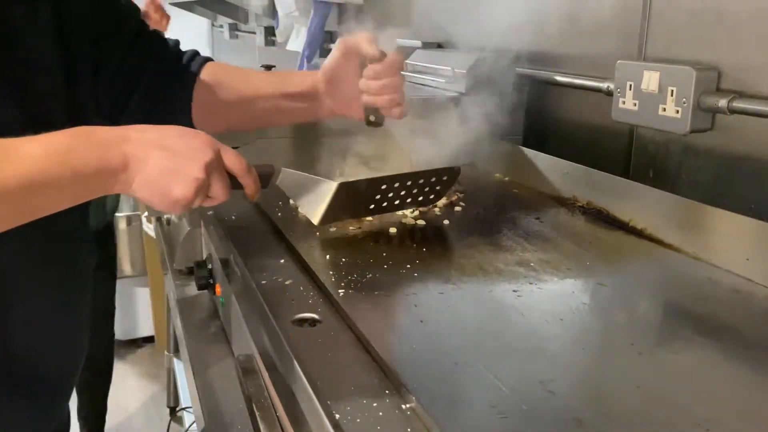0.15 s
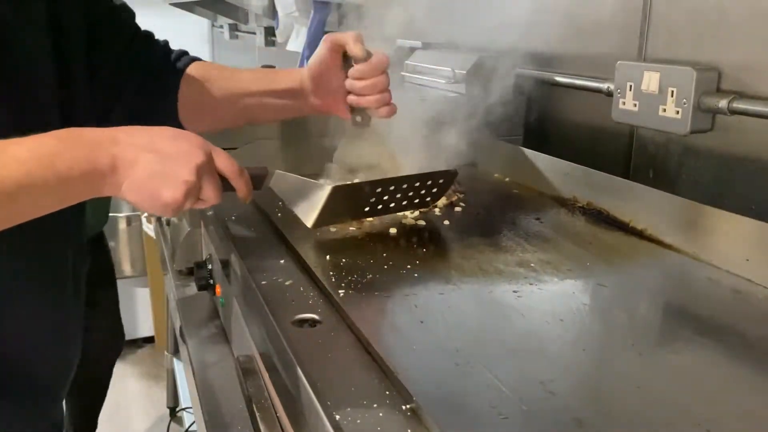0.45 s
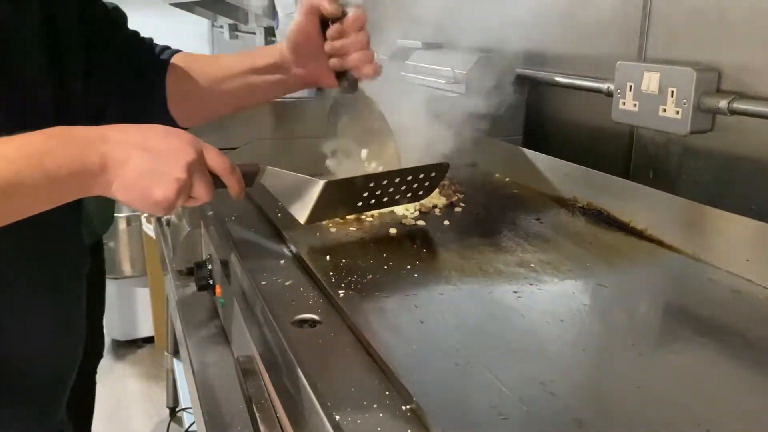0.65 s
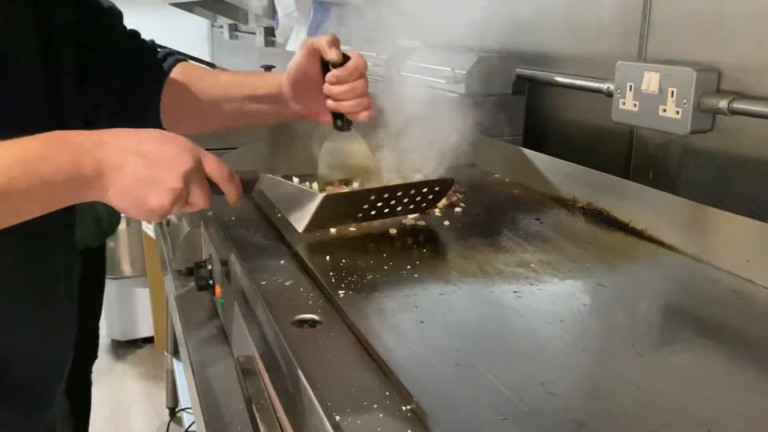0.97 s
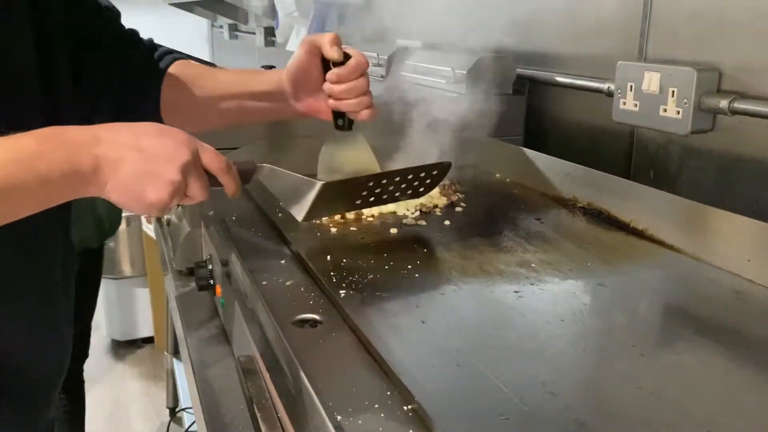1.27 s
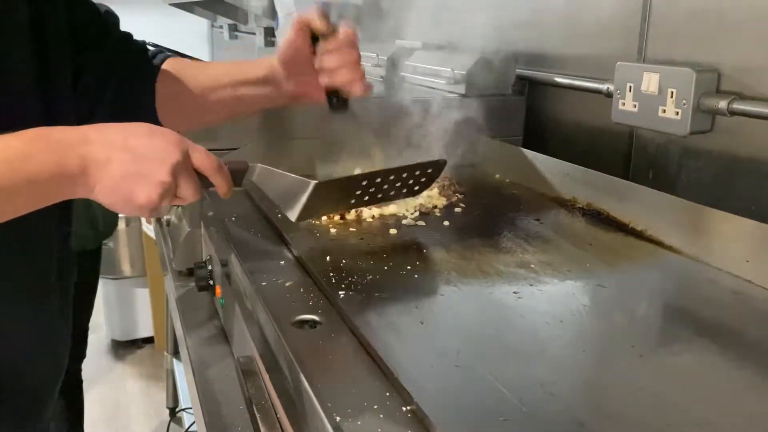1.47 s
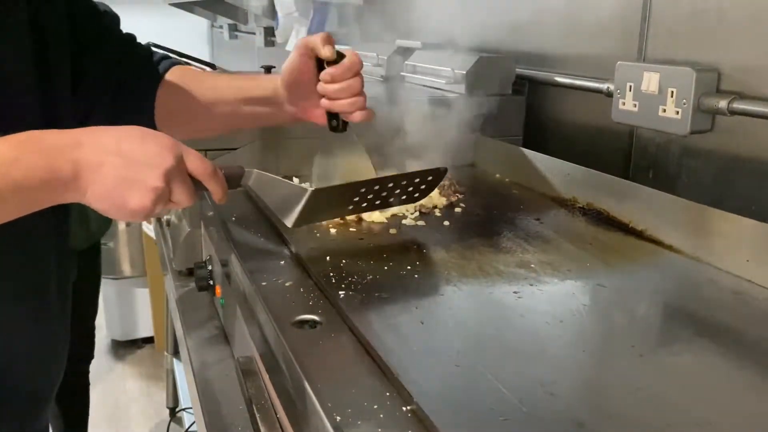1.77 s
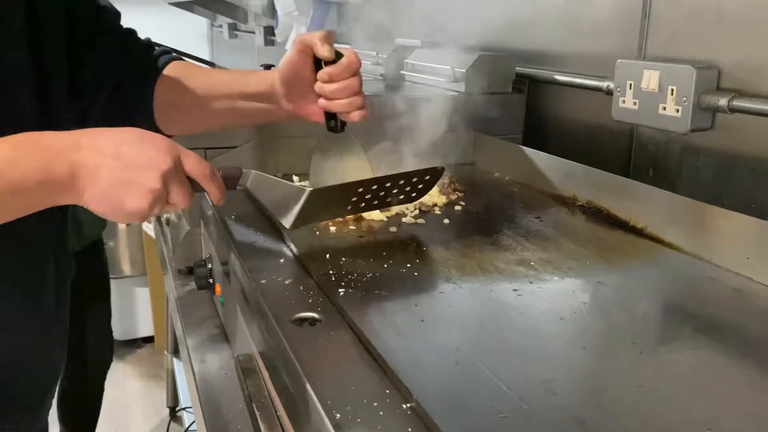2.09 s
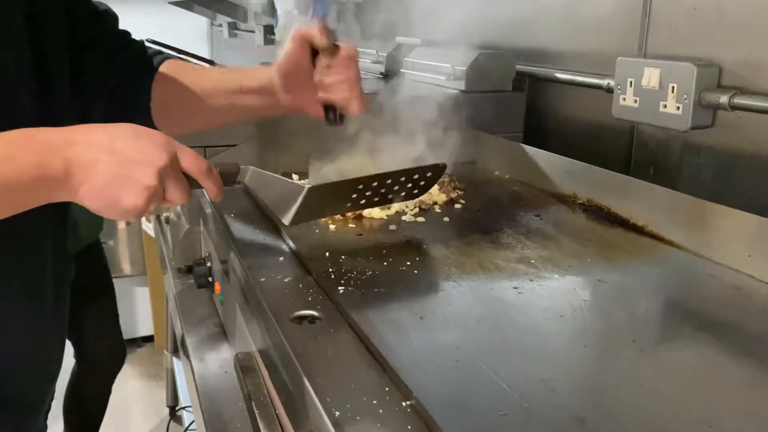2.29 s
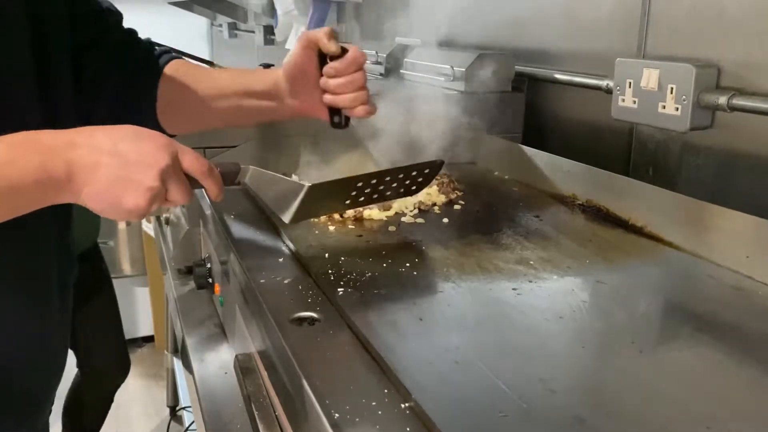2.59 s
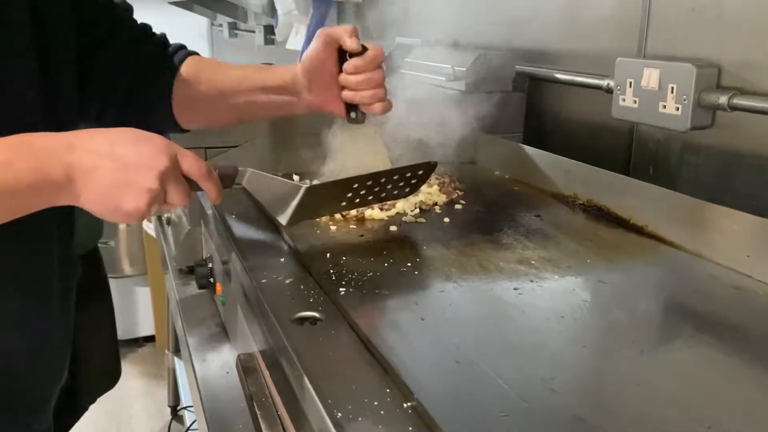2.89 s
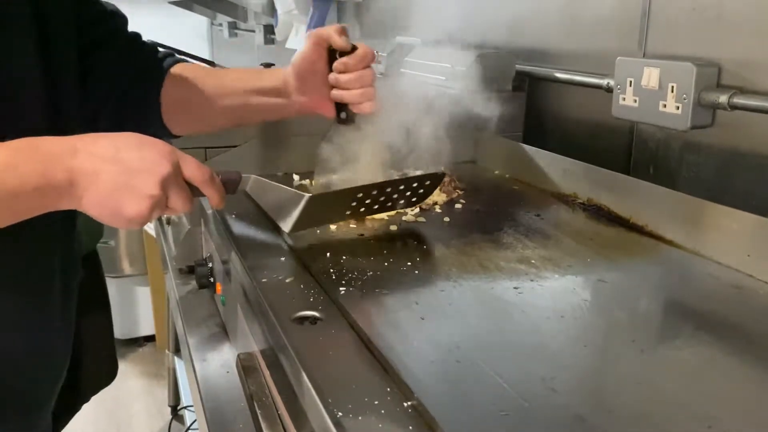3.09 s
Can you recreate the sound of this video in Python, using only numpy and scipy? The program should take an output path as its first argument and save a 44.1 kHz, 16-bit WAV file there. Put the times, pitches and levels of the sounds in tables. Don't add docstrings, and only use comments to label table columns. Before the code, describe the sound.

Steel scraper clacks hard on a hot griddle about four times a second over sizzling fat

```python
import sys
import numpy as np
from scipy import signal
from scipy.fft import rfft, irfft
from scipy.io import wavfile

SR = 44100
rng = np.random.default_rng(int(sys.argv[2]) if len(sys.argv) > 2 else 0)


def amplitude_ratio(level_db):
    exponent = np.asarray(level_db, float) / 20
    return 10 ** exponent


def master_out(mix):
    frames = np.transpose(np.atleast_2d(mix))
    ceiling = np.clip(frames, -1, 1)
    pcm = np.round(ceiling * 32767).astype(np.int16)
    wavfile.write(sys.argv[1], SR, pcm)


N = 143325


def rms_one(x):
    return x / np.sqrt(np.mean(x ** 2) + 1e-20)


def at_hz(rows, hz, column=1):
    table = np.array(rows)
    return np.interp(np.log(hz), np.log(table[:, 0]), table[:, column])


def drift(rate_hz):
    r = np.exp(-80 * np.pi * rate_hz / SR)
    white = rng.standard_normal(N // 40 + 2002)
    slow = signal.lfilter([1], [1, -2 * r, r * r], white)[2000:]
    return np.interp(np.arange(N) / 40, np.arange(len(slow)), rms_one(slow))


def bands(lowest_hz, count):
    edges = lowest_hz * 2 ** (np.arange(count + 1) / 2)
    return [(np.sqrt(a * b), signal.butter(2, [a, b], "band", fs=SR, output="sos"))
            for a, b in zip(edges, edges[1:])]


def coloured(white, spectrum, lowest_hz, patchy_db, count):
    out, together = 0, drift(2.7)
    for k, (hz, sos) in enumerate(bands(lowest_hz, count)):
        flicker_db = patchy_db * (0.34 * together + drift(21.0))
        out = out + amplitude_ratio(at_hz(spectrum, hz) + flicker_db) * signal.sosfilt(sos, white[k % 2])
    return rms_one(out)


# frequency in Hz, level in dB per Hz.
HOOD_SPECTRUM = [(30, -41), (55, -0.5), (100, -5), (280, -7.5), (500, -23), (1000, -23), (1600, -24.5),
                 (4000, -33)]
HOOD_DB, RUMBLE_CUT_HZ = -25, 40
HUM_HZ, HUM_DB = 297, -32.5


def hood():
    phase = 2 * np.pi * np.cumsum(HUM_HZ + 3.12 * drift(4.1)) / SR
    waver_db = np.clip(4.8 * drift(2.4), -6, 4)
    hum = amplitude_ratio(HUM_DB + waver_db) * np.array([np.sin(phase), np.cos(phase)])
    air = coloured(rng.standard_normal((2, 2, N)), HOOD_SPECTRUM, 22.47, patchy_db=-2.2, count=15)
    high_pass = signal.butter(3, RUMBLE_CUT_HZ, "high", fs=SR, output="sos")
    return amplitude_ratio(HOOD_DB) * signal.sosfilt(high_pass, air) + hum


# frequency in Hz, level in dB per Hz.
SIZZLE_SPECTRUM = [(800, -71.5), (2400, 2.5), (3500, -2), (5000, 4), (6500, -1.5), (10000, 2.5),
                   (13000, -3.5), (15800, -8.5)]
# time in seconds, level in dB.
FRYING_HEAT = [(0, -26.5), (.3, -27.5), (.6, -28), (.8, -27), (1.2, -27.5), (1.6, -28), (2.0, -29),
               (2.6, -30.5), (3.25, -30)]
SPITS_PER_S, SPIT_SPREAD_DB, SPIT_SHARE = 7200, 3.5, 0.7


def sizzle():
    shape = (2, 2, N)
    spit_db = SPIT_SPREAD_DB * np.minimum(rng.exponential(1, shape), 5)
    sizes = amplitude_ratio(spit_db) * rng.choice([-1, 1], shape)
    spits = rms_one(sizes * (rng.random(shape) < SPITS_PER_S / SR))
    white = SPIT_SHARE * spits + rng.standard_normal(shape)
    heat_db = np.interp(np.arange(N) / SR, *np.transpose(FRYING_HEAT))
    return amplitude_ratio(heat_db) * coloured(white, SIZZLE_SPECTRUM, 865, patchy_db=0.83, count=9)


# blow time in seconds, peak in dB, blade brightness in dB, low thud in dB,
# gain dip after it in dB.
BLOWS = [(0.2, -5.5, -1.5, -7, 2.5), (0.483, -6.5, -0.5, -2.5, 2.5), (0.756, -11, -1, -6, 0),
         (1.015, -7, 0.0, -5.5, 3), (1.288, -7, -1.5, -3, 3), (1.548, -6.5, 0.5, -0.5, 2.5),
         (1.818, -6.5, 0.0, -1.5, 4.5), (2.078, -6.5, 1, -3, 4.5), (2.348, -6, 0.0, -2.5, 2.5),
         (2.598, -6.5, 1.5, 0.0, 3), (2.855, -6.5, 2, -4, 3.5), (3.115, -7, 2, -3.5, 4.5)]
THUD_BELOW_HZ, BRIGHT_ABOVE_HZ = 350, 1650


def blow_db(hz):
    _, peak_db, bright_db, thud_db, _ = np.transpose(BLOWS)
    return peak_db + bright_db * (hz > BRIGHT_ABOVE_HZ) + thud_db * (hz < THUD_BELOW_HZ)


BENDING_LAG_S, FIRST_HZ = 0.0015, 2404


def lag(hz):
    return int(max(BENDING_LAG_S * SR * (1000 / hz - 1000 / FIRST_HZ), 0))


def bursts(colour, level_db, fresh, rise_s):
    t = np.arange(SR // 3) / SR
    white = fresh * rng.standard_normal((len(BLOWS), 2, len(t))) + rng.standard_normal((2, len(t)))
    white = white * (1 - np.exp(-t / rise_s)) / np.hypot(1, fresh)
    burst = 0
    for hz, sos in bands(120, count=13):
        gain = amplitude_ratio(blow_db(hz) + at_hz(colour, hz) + level_db)
        decay = amplitude_ratio(-60 * t / at_hz(colour, hz, column=2))
        arrived = t * SR >= lag(hz)
        burst = burst + gain[:, None, None] * signal.sosfilt(sos, white * arrived * decay)
    out = np.zeros((2, N + SR))
    for row, sound in zip(BLOWS, burst):
        start = int(row[0] * SR)
        out[:, start:start + len(t)] += sound
    return out[:, :N]


# frequency in Hz, level in dB per Hz, t60 in seconds.
RATTLE = [(150, 7, 0.42), (540, 8.5, 0.4), (960, 6, 0.21), (1480, 5.5, 0.17), (2170, -3.5, 0.48),
          (3200, -7, 0.27), (5230, -3, 0.13), (8000, -25, 0.13)]


def rattle():
    return bursts(RATTLE, level_db=6, fresh=1.4, rise_s=0.038)


# delay in seconds, level in dB.
ECHOES = [(.0045, -20.5), (.0085, -11.5), (.0155, -14.5), (0.032, -9.5), (.043, -12)]
ECHO_CUT_HZ = 2160


def kitchen(x):
    early = np.zeros(SR // 5)
    for delay_s, db in ECHOES:
        early[int(delay_s * SR)] = amplitude_ratio(db)
    early = signal.sosfilt(signal.butter(1, ECHO_CUT_HZ, fs=SR, output="sos"), early)
    return x + signal.fftconvolve(x, early[None], axes=1)[:, :N]


# frequency in Hz, level in dB per Hz, t60 in seconds.
CRACK = [(150, 0, 0.17), (400, 3, 0.054), (960, 3, 0.035), (1600, -5.5, 0.087), (2164, -4.5, 0.087),
         (2970, -19, 0.082), (4950, -11, 0.017), (8400, -31, 0.026)]


def crack():
    return kitchen(bursts(CRACK, level_db=17, fresh=1.0, rise_s=0.00021))


PLATE_HZ = [152, 182, 285, 418, 540, 608, 732, 818, 888, 1000, 1090, 1160, 1320, 1460]
# plate mode level in dB, t60 in seconds.
PLATE = [(-11, 0.54), (-3, 0.17), (3, 0.037), (1.5, 0.053), (-7, .18), (-9.5, .22), (-4.5, 0.18),
         (-12.5, 0.36), (-1, 0.083), (-7, 0.12), (4.5, 0.054), (-7, 0.28), (-11.5, 0.12), (-12.5, 0.12)]
BLADE_HZ = [1790, 2017, 2181, 2310, 2400, 2478, 2716, 3300, 4904, 5184, 5500]
# blade mode level in dB, t60 in seconds.
BLADE = [(-19, 0.039), (-13.5, 0.28), (-10, 0.12), (-14.5, 0.25), (-2, .04), (-5, 0.053), (-27, 0.036),
         (-13, 0.045), (-14.5, 0.038), (-22, .12), (-17, 0.044)]
STEEL_DB, MODE_SCATTER_DB = -3.5, 2


def steel():
    at, out = (np.array(BLOWS)[:, 0] * SR).astype(int), np.zeros((2, N))
    for hz, (db, t60_s) in zip(PLATE_HZ + BLADE_HZ, PLATE + BLADE):
        scatter_db = MODE_SCATTER_DB * rng.standard_normal(len(at))
        clicks = np.full(N, 1e-18)
        clicks[at + lag(hz)] = amplitude_ratio(blow_db(hz) + db + STEEL_DB + scatter_db)
        r, w = amplitude_ratio(-60 / (t60_s * SR)), 2 * np.pi * hz / SR
        ringing = signal.lfilter([1], [1, -r * np.exp(1j * w)], clicks)
        out += [ringing.imag, rng.choice([-1, 1]) * ringing.real]
    return out


def scene():
    return hood() + sizzle() + rattle() + crack() + steel()


DIP_FALL_S, DIP_HOLD_S, DIP_RISE_S = 0.053, 0.14, 0.068
CEILING_LEVEL = 0.92


def gain_dips(x):
    since_s = np.arange(N) / SR - np.array(BLOWS)[:, :1]
    fall = np.clip(since_s / DIP_FALL_S, 0, 1)
    recovery = np.clip((DIP_HOLD_S + DIP_RISE_S - since_s) / DIP_RISE_S, 0, 1)
    held = x * amplitude_ratio(-np.array(BLOWS)[:, 4] @ (fall * recovery))
    return held / (1 + (held / CEILING_LEVEL) ** 4) ** 0.25


# frequency in Hz, left louder by dB, left leads by radians,
# likeness from 0 to 1.
PORTS = [(53, 1, 0.97, 0.93), (203, 14, 1.6, 1), (298, 12.5, 5.92, 1), (495, 2.5, 5.3, 1), (860, 9, 5.1, 1),
         (1114, 4, 5.98, 0.12), (2390, 5, 6.7, 0.27), (5540, 8, 5.1, 0.78)]
SHARED_ABOVE_HZ, SHARED_LEAD_SAMPLES = 6350, 10


def two_ports(x):
    near, other = rfft(x)
    hz = np.arange(len(near)) * SR / N + 1
    alike = np.clip(at_hz(PORTS, hz, column=3), 0, 1)
    mixed = alike * near + np.sqrt(1 - alike ** 2) * other
    turned = amplitude_ratio(-at_hz(PORTS, hz)) * np.exp(-1j * at_hz(PORTS, hz, column=2)) * mixed
    early = near * np.exp(2j * np.pi * hz * SHARED_LEAD_SAMPLES / SR)
    share = np.clip((hz - SHARED_ABOVE_HZ) / 400 + 0.5, 0, 1)
    right = (1 - share) * turned - share * early
    return irfft(np.array([near, right]), N)


def low_pass(x):
    return signal.sosfilt(signal.butter(12, 17060, fs=SR, output="sos"), x)


def record(dry):
    low_cut = signal.butter(2, 30, "high", fs=SR, output="sos")
    both = two_ports(signal.sosfilt(low_cut, gain_dips(dry)))
    treble_cut = signal.cheby2(24, 70, 16030, fs=SR, output="sos")
    return low_pass(signal.sosfilt(treble_cut, both))


dry = scene()
out = record(dry)
master_out(out)
```